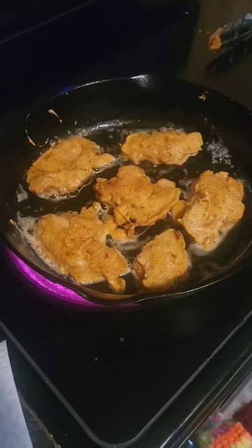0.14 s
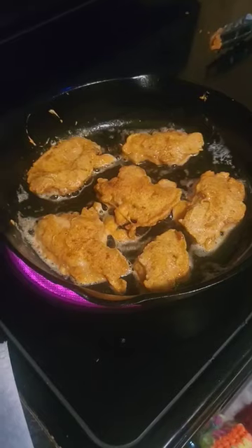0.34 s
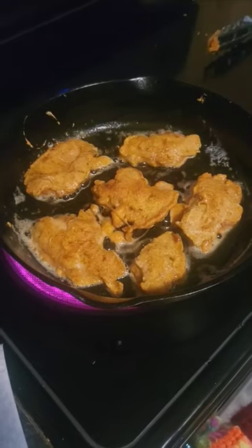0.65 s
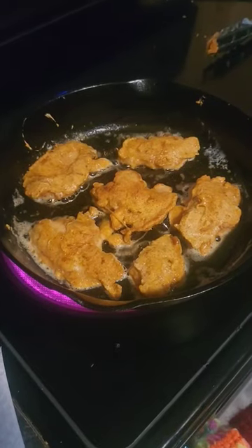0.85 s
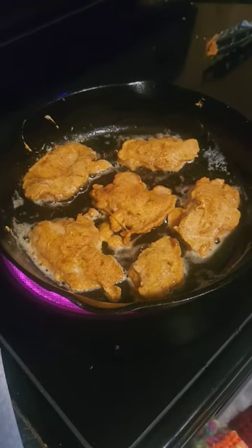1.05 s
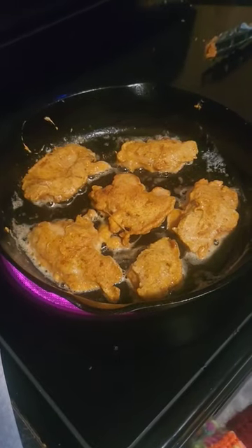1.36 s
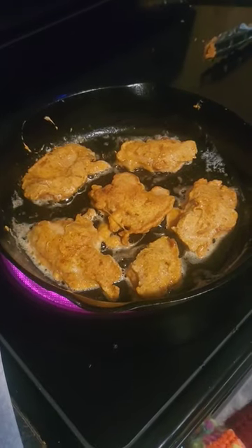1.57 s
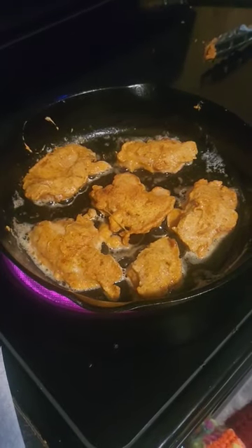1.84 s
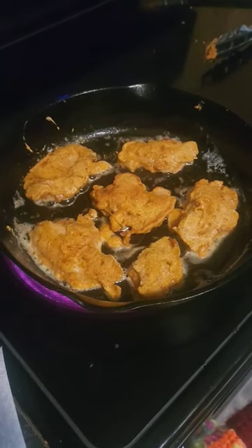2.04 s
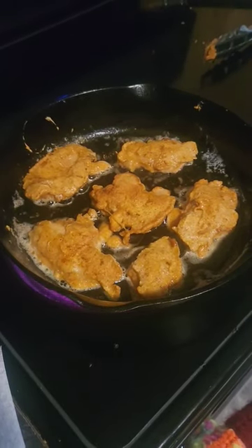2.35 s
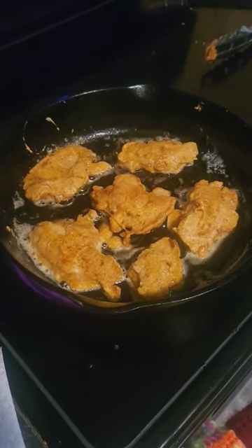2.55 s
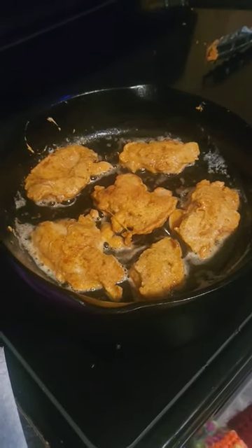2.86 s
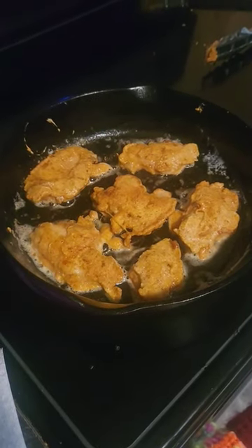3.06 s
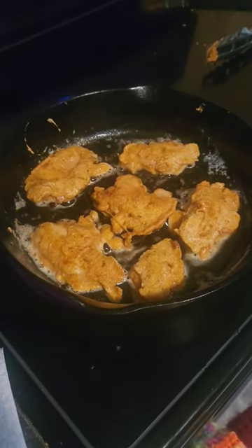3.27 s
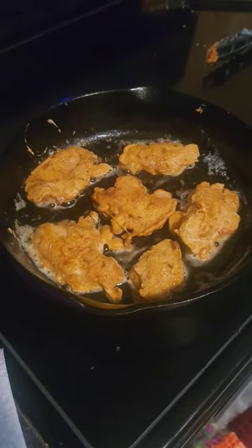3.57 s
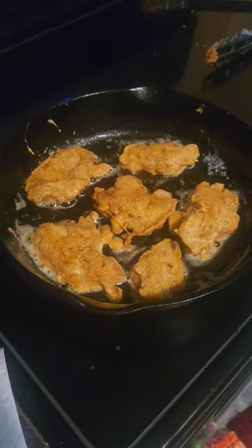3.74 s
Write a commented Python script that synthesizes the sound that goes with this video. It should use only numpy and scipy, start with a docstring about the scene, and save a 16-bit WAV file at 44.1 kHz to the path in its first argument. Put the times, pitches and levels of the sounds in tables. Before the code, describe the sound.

Hot oil sizzles and crackles around frying food over a low kitchen fan rumble.

```python
"""Battered fish frying in a pan of hot oil, close to a pair of microphones. Thousands of tiny steam
bubbles burst each second, water ticks as it meets the oil, and now and then a big bubble pops.
Pan wall, stove and hood throw the sizzle back. The right microphone favours the middle range,
the left one the treble. Behind the pan a kitchen fan rumbles, mains hums, and something bumps once."""
import sys
import numpy as np
from scipy import signal
from scipy.fft import rfft, irfft, next_fast_len
from scipy.io import wavfile
from scipy.ndimage import uniform_filter1d

SR = 44100
rng = np.random.default_rng(int(sys.argv[2]) if len(sys.argv) > 2 else 0)


def file_out(sig):
    """Save sig as 16-bit WAV at sys.argv[1]."""
    # one column per channel
    cols = np.atleast_2d(sig).T
    # limit, then scale
    lim = np.clip(cols, -1, 1)
    pcm = np.round(lim * 32767).astype(np.int16)
    wavfile.write(sys.argv[1], SR, pcm)


N = 172431
T = np.arange(N) / SR
FFT_SIZE = next_fast_len(N + SR // 2)
HZ = np.fft.rfftfreq(FFT_SIZE, 1 / SR)

# How hard the oil sizzles, before each bubble size's gain: time_s, middle_db, low_treble_db, high_treble_db
SIZZLE_LEVELS = [(0.16, -49, -49.5, -52), (0.25, -47.5, -47, -51.9), (0.46, -51, -49, -55),
                 (0.561, -50, -48.5, -52.5), (0.72, -50, -49, -55.5), (0.95, -49, -48, -49.5),
                 (1.07, -44.5, -47.5, -53.5), (1.17, -48.5, -48, -49.5), (1.45, -48.5, -49, -49.5),
                 (1.66, -51.5, -48, -54), (1.7, -49.4, -53.5, -61.5), (1.86, -47.5, -49, -54.5),
                 (2.07, -47.5, -46, -54), (2.12, -43, -42.9, -44.5), (2.2, -44.9, -43.5, -41),
                 (2.42, -50, -49.5, -49.5), (2.66, -46.5, -47, -49.5), (2.85, -47.5, -47.5, -48.5),
                 (3.03, -47, -46, -44.5), (3.25, -47, -47.5, -48.5), (3.33, -46.5, -46.5, -46),
                 (3.62, -46, -47, -46.5), (3.72, -46.5, -46.5, -48), (3.9, -49, -48.5, -49.2)]
# Bubble sizes, coarse to fine: low_hz, high_hz, bursts_per_s, spread_db, life_cycles, gain_db
BUBBLE_SIZES = [(239, 3870, 1900, 4.5, 3.33, -1), (3056, 8660, 2000, 5, 2.5, 0.5),
                (9070, 16100, 1900, 7.5, 5.5, 0)]
# Brief spurts and lulls of the sizzle: centre_s, half_length_s, change_db
SIZZLE_SPURTS = [(3.152, 0.014, 1.5), (3.19, 0.016, -3), (3.247, 0.032, 3), (3.369, 0.02, -3),
                 (3.764, 0.025, 0)]
# Big bubbles: start_s, relative_peak_db, pitch_hz, width_octaves
BIG_BUBBLES = [(.254, -28, 1760, 1.15), (.581, -27, 6200, 0.65), (1.0243, -26.5, 4300, 0.51),
               (1.086, -23.5, 4140, 1.05), (1.3045, -46, 4500, .9), (1.460, -22, 5420, 0.6),
               (1.5314, -18.5, 1620, 0.54), (1.635, -27, 9000, 1), (1.652, -26, 5860, 0.55),
               (1.725, -30, 2430, 0.69), (1.7965, -25, 2200, 1.3), (1.847, -31, 2580, .9),
               (2.079, -26.5, 1370, 0.88), (2.094, -16.5, 3900, 0.77), (2.1075, -21, 960, 0.67),
               (2.1235, -47, 1400, 1.2), (2.184, -20, 9600, .9), (2.338, -23.5, 5800, 0.71),
               (2.5905, -16, 4650, .6), (2.6465, -23, 4350, 2.3), (2.713, -26, 2260, 1.1),
               (3.139, -27.5, 2540, 2.1), (3.1612, -24, 2150, 0.64), (3.239, -24.5, 2410, 1.1),
               (3.2663, -30.5, 4070, 1.1), (3.376, -25, 2860, 1.5), (3.6876, -18, 10800, 1.3),
               (3.7138, -21.5, 4370, 1.02), (3.8086, -27.5, 6500, 0.66), (3.8347, -18.5, 1450, 1.34)]
# Colour of the pan at each microphone: frequency_hz, left_db, right_db
PAN_COLOUR = [(280, -26, -21.5), (466, -30, -25.5), (690, -17, -8), (785, -24.6, -13.5),
              (1250, -14.5, -2.6), (1374, -18, -9), (2180, -14, -0.9), (2500, -14, -1.64),
              (3350, -16, -14.5), (4320, -10.5, -16), (5560, -12, -18.5), (6160, -4.5, -24),
              (6650, -12, -13), (7110, -17.5, -30), (7680, -4.5, -31), (8400, -12, -23), (9480, -15, -18.5),
              (10300, -6, -21), (11150, -11.3, -25), (11650, -7, -19.5), (13900, -7.5, -17.5),
              (16200, -15, -45)]
# The fan's draught: time_s, deep_rumble_db, upper_rumble_db
FAN_DRAUGHT = [(.16, -57.5, -48.5), (.42, -53, -60.5), (.48, -47, -49), (1.4, -46.5, -52),
               (1.65, -45.5, -53), (2.15, -46.5, -53.5), (2.4, -47.5, -56.5), (2.9, -47.5, -55.5),
               (3.3, -44.5, -55), (3.9, -52.5, -52)]
# Colour of the fan's rumble: frequency_hz, left_db, right_db
FAN_COLOUR = [(12, -11, -26), (22, -5, -16), (36.4, -16, -11), (45.6, -1.5, 0), (60, -1.5, 5),
              (85, -6.5, 1), (106.3, -11, -1.5), (133.4, -16.5, -10), (163.7, -30.5, -21.5),
              (218, -65, -42), (320, -41, -30), (500, -62, -61), (1500, -63, -71)]
# Colour of the bump: frequency_hz, gain_db
BUMP_COLOUR = [(60, -24), (140, 6), (260, -1), (420, -3.5), (600, -16), (1500, -33)]

RIGHT_LAG_S = .00033  # the pan's sound reaches the right microphone later
ROOM_T60_S = .14


def sizzle(colour, spots=12, foam_db=-4):
    """Steam bubbles of three sizes burst at spots around the fish, over the hiss of the finest foam."""
    times, *levels = np.transpose(SIZZLE_LEVELS)
    flurry_db = .92 * wobble(240)
    surge_db = .9 * wobble(14)
    spurt_db = sum(db * np.exp(-((T - at) / half) ** 2) for at, half, db in SIZZLE_SPURTS)
    out = 0
    for (low, high, rate, spread_db, cycles, gain_db), level in zip(BUBBLE_SIZES, levels):
        crackle = sum(from_pan(bursts(low, high, rate / spots, spread_db, cycles)) for _ in range(spots))
        foam = amp(foam_db) * rng.standard_normal((2, N))
        band = 1 / np.sqrt((1 + (low / (HZ + 1)) ** 8) * (1 + (HZ / high) ** 16))
        layer = unit(filtered(unit(crackle) + foam, band * colour))
        level_db = np.interp(T, times, level) + gain_db + wobble(40)  # each size also flickers alone
        out = out + layer * amp(level_db + flurry_db + surge_db + spurt_db)
    return out


def bursts(low_hz, high_hz, per_s, spread_db, cycles, count=2500, size=384):
    """Small bubbles burst at random, each a brief damped ring."""
    wait, pitch, life, closed = rng.random((count, 4)).T
    strength = amp(spread_db * np.minimum(rng.standard_normal(count), 2.2))
    starts = (np.cumsum(-np.log(1 - wait)) / per_s * SR).astype(int)
    live = starts < N
    hz = low_hz + (high_hz - low_hz) * pitch[live, None]
    longer = np.where(closed[live, None] < .12, 4.6, 1)  # some stay closed and ring longer
    turns = hz * T[:size]
    height = strength[live, None] * np.sqrt(hz / np.sqrt(longer))
    decay = fade(turns, cycles * longer * (.5 + life[live, None]))
    rings = height * np.sin(2 * np.pi * turns) * decay
    samples = starts[live, None] + np.arange(size)
    return np.bincount(samples.ravel(), rings.ravel(), N)[:N]


def spatter(colour, ticks_per_s=170, level_db=-54, spots=6, count=400):
    """Water meets oil in sharp broadband ticks, stronger when the pan sizzles harder."""
    ticks = 0
    for _ in range(spots):
        starts = (np.cumsum(rng.exponential(1, count)) * spots / ticks_per_s * SR).astype(int)
        strength = amp(-.5 * np.minimum(rng.standard_normal(count), 2))
        live = starts < N
        ticks = ticks + from_pan(np.bincount(starts[live], strength[live], N))
    times, _, treble_db, _ = np.transpose(SIZZLE_LEVELS)
    swell_db = np.interp(T, times, treble_db - treble_db.mean())
    return unit(filtered(ticks, colour)) * amp(level_db + swell_db)


def pops(colour, gain_db=-1.5, glide_s_per_octave=.0004, size=2 ** 14):
    """A big bubble snaps, its pitch rising as it opens, and throws a short spray of droplets."""
    out = np.zeros((2, N + size))
    f = np.fft.rfftfreq(size, 1 / SR)
    mics = np.array([np.interp(f, HZ, side) for side in colour])
    direct = np.exp(-2j * np.pi * f * np.array([[0], [RIGHT_LAG_S]]))
    lead = 128  # samples of room for the chirp's early low end
    for start_s, peak_db, pitch_hz, width in BIG_BUBBLES:
        octaves = np.log2((f + 1) / pitch_hz)
        peak = np.exp(-.5 * (octaves / width) ** 2)
        skirt = amp(-6.5) * (octaves < 0) * np.exp(-.5 * (octaves / 4.9) ** 2)  # body below the pitch
        phase = 2 * np.pi * np.cumsum(glide_s_per_octave * octaves) * f[1]
        chirp = np.maximum(peak, skirt) * np.exp(-1j * phase)
        spray = amp(-4) * tail(t60_s=.035)
        room = amp(-14) * tail(ROOM_T60_S)
        path = direct + rfft(spray + room, size)
        snap = np.roll(irfft(path * mics * chirp), lead, axis=1)
        first = round(start_s * SR) - lead
        out[:, first:first + size] += amp(peak_db + gain_db) * snap / abs(snap).max()
    return out[:, :N]


def from_pan(x, wall_db=-2.5, room_db=-8):
    """One spot in the pan reaches each microphone directly, then off pan wall, stove and kitchen."""
    path = amp(wall_db) * tail(t60_s=.027) + amp(room_db) * tail(ROOM_T60_S)
    right_lag = round(RIGHT_LAG_S * SR + rng.normal(0, 1))
    path[0, 0] += 1
    path[1, right_lag] += 1
    return signal.oaconvolve(x[None], path, axes=1)[:, :N]


def hood(echo_db=-9, smooth_bins=1500):
    """Echoes between hood and stove put a fine ripple on the spectrum and leave its broad colour even."""
    response = 1 + rfft(amp(echo_db) * tail(t60_s=.088), FFT_SIZE)
    return response / uniform_filter1d(abs(response), smooth_bins, axis=1)


def fan(correlation=.9, split_hz=83.2, swell_db=1.6):
    """The kitchen fan's draught: a low, wavering rumble, nearly alike in both microphones."""
    middle, side = rng.standard_normal((2, N))
    angle = np.arccos(correlation) / 2
    air = np.cos(angle) * middle + np.sin(angle) * np.array([side, -side])
    deep = 1 / (1 + (HZ / split_hz) ** 8)
    times, *levels = np.transpose(FAN_DRAUGHT)
    rumble = 0
    for band, level_db in zip((deep, 1 - deep), levels):
        layer = unit(filtered(air, gains(FAN_COLOUR) * band))
        rumble = rumble + layer * amp(np.interp(T, times, level_db))
    return rumble * amp(swell_db * wobble(13))


def mains_hum(pitch_hz=120.9, level_db=-59):
    """Mains hums on one steady tone, the same in both microphones."""
    return amp(level_db) * np.sin(2 * np.pi * pitch_hz * T)


def bump(start_s=1.953, boom_hz=215, attack_s=.0031):
    """One soft, dull bump a little to the right, with a low boom after it."""
    t = np.maximum(T - start_s, 0)
    thud = unit(filtered(rng.standard_normal(N), gains(BUMP_COLOUR)))
    boom = unit(filtered(rng.standard_normal(N), np.exp(-((HZ - boom_hz) / 60) ** 2)))
    knock = amp(-44) * thud * fade(t, t60=.13) + amp(-55.5) * boom * fade(t, t60=.35)
    return knock * (1 - np.exp(-t / attack_s)) * amp([[-2], [2]])


def amp(db):
    """Decibels to gain."""
    return 10 ** (np.asarray(db) / 20)


def unit(x):
    """Scaled to rms 1."""
    return x / np.sqrt(np.mean(x ** 2) + 1e-20)


def fade(t, t60):
    """Exponential decay, 60 dB down at t60."""
    return np.exp(-np.log(1000) * t / t60)


def gains(points):
    """A frequency response for each dB column of a colour table."""
    hz, *columns = np.transpose(points)
    return amp([np.interp(np.log(HZ + 1), np.log(hz), db) for db in columns])


def filtered(x, response):
    """x through a frequency response."""
    return irfft(rfft(x, FFT_SIZE) * response, FFT_SIZE)[..., :N]


def wobble(knots_per_s):
    """A curve wandering between random knots."""
    return np.interp(T * knots_per_s, np.arange(4096), rng.standard_normal(4096))


def tail(t60_s):
    """A dying stereo cloud of echoes, energy 1 a side."""
    t = T[:SR // 4]
    cloud = rng.standard_normal((2, len(t))) * fade(t, t60_s) * (1 - np.exp(-t / .0002))
    return cloud / np.linalg.norm(cloud, axis=1, keepdims=True)


def scene():
    """The pan up close, the kitchen behind it."""
    colour = gains(PAN_COLOUR)
    pan = sizzle(colour * hood()) + spatter(colour) + pops(colour)
    return pan + fan() + mains_hum() + bump()


def record(dry, start_s=.161, top_hz=15550):
    """The microphones open abruptly and pass nothing above the band limit."""
    return filtered(dry * (T >= start_s), HZ < top_hz)


dry = scene()
out = record(dry)
file_out(out)
```